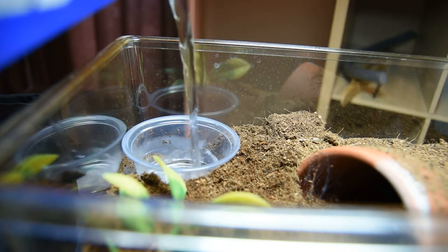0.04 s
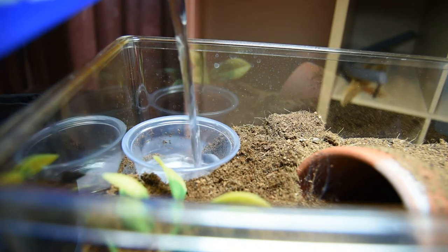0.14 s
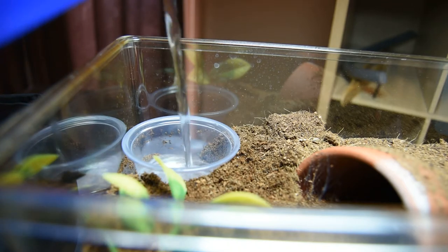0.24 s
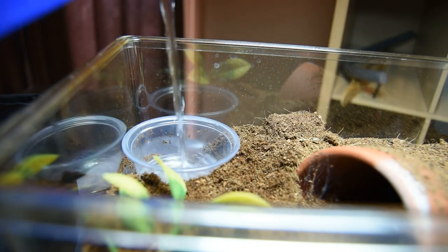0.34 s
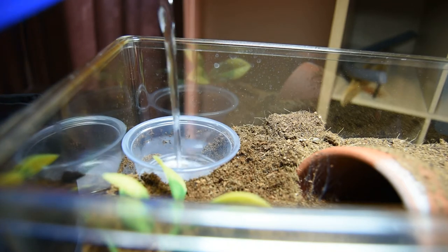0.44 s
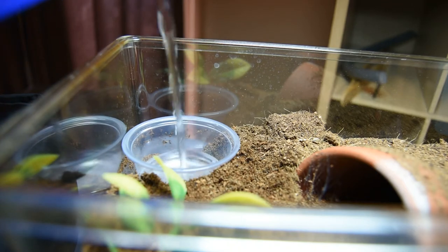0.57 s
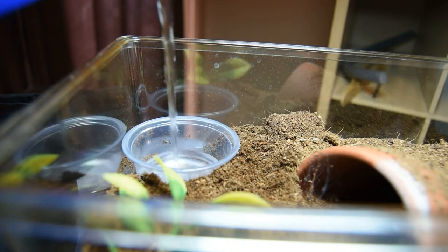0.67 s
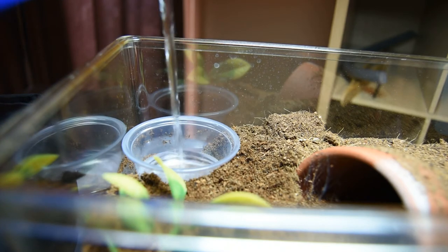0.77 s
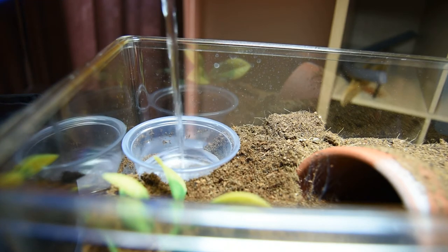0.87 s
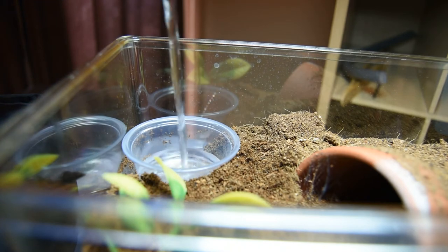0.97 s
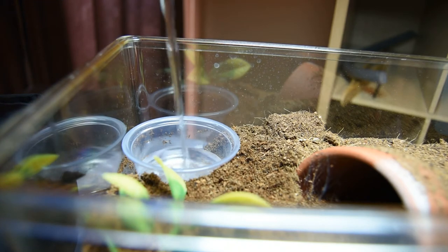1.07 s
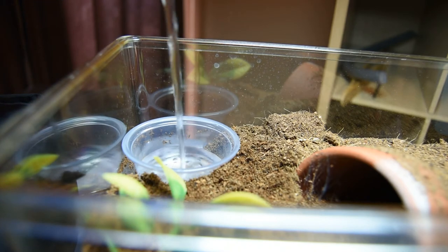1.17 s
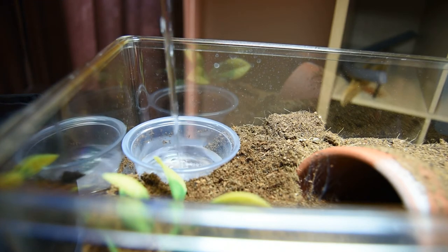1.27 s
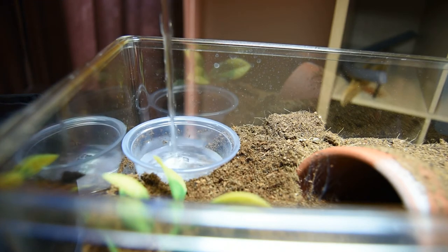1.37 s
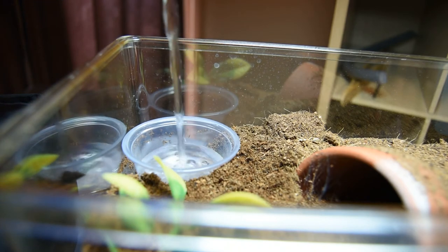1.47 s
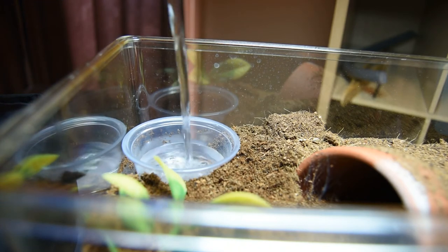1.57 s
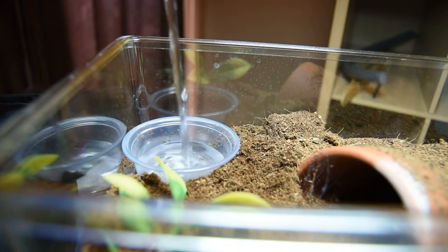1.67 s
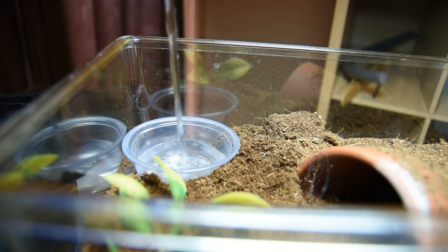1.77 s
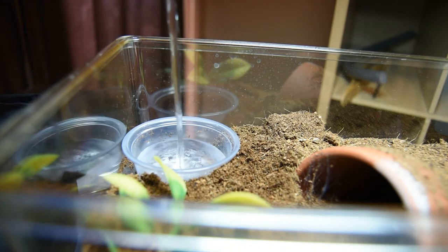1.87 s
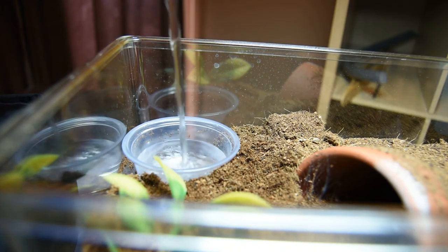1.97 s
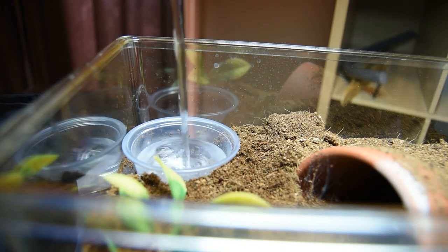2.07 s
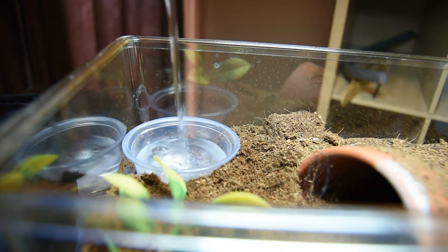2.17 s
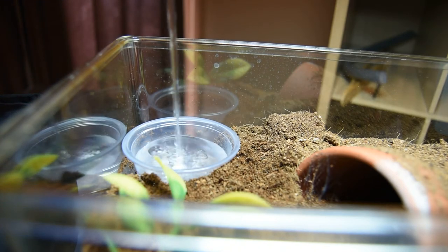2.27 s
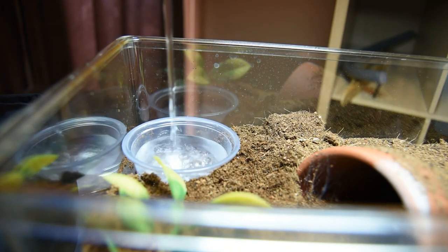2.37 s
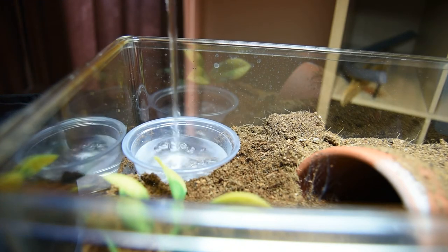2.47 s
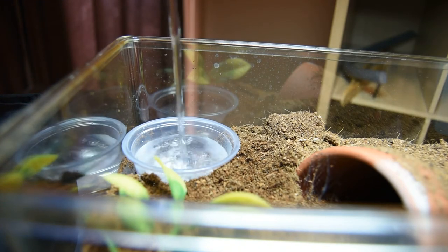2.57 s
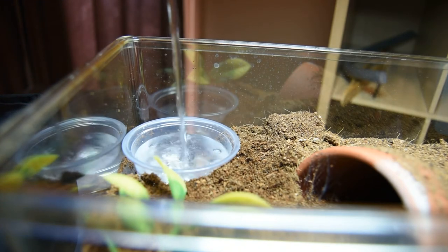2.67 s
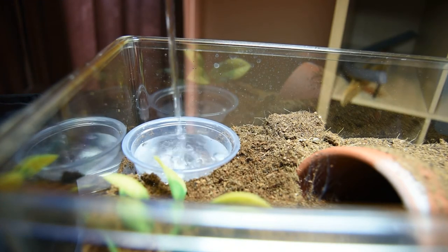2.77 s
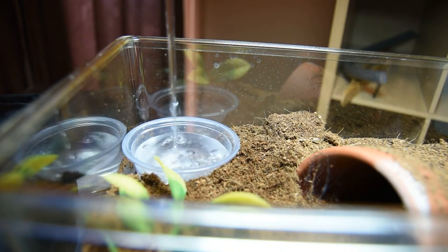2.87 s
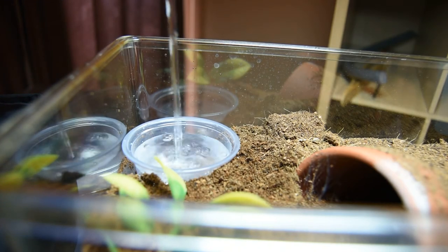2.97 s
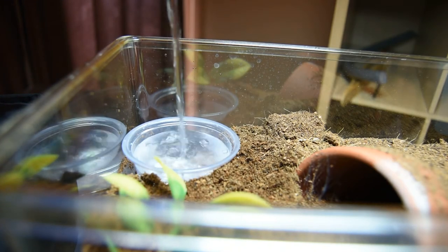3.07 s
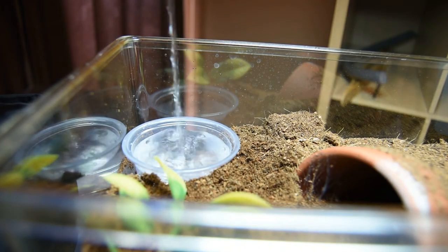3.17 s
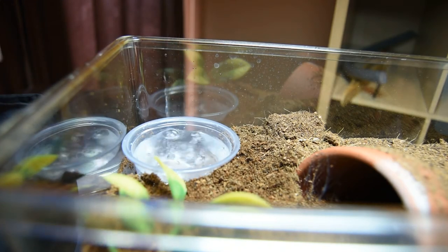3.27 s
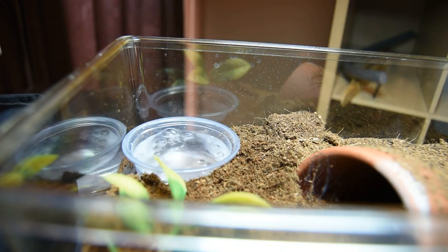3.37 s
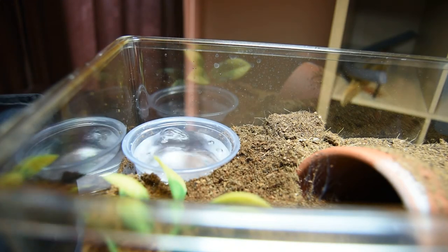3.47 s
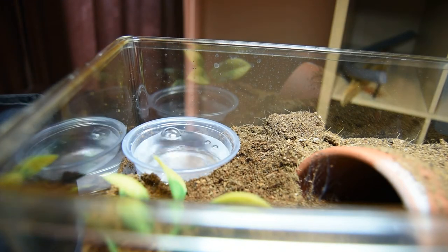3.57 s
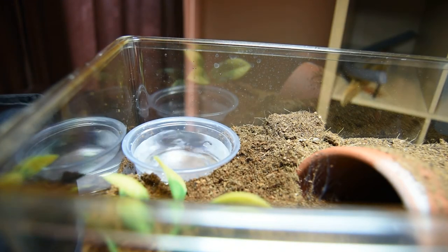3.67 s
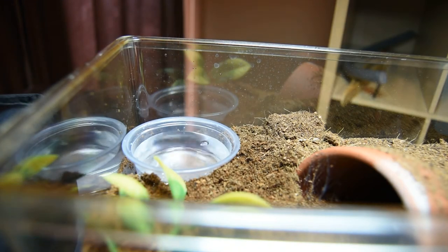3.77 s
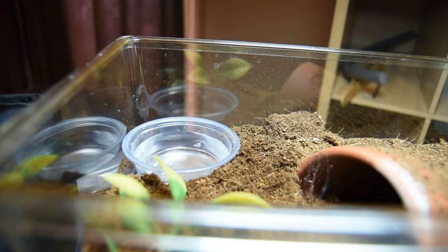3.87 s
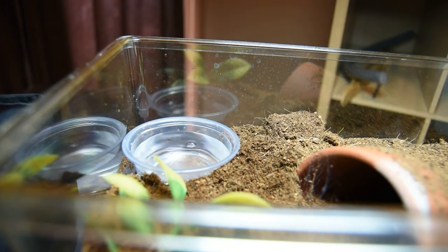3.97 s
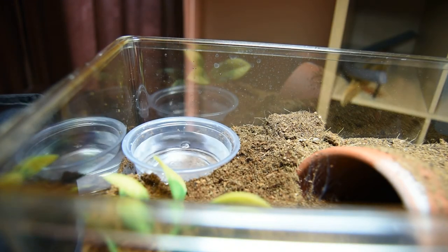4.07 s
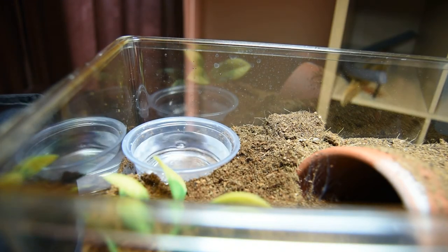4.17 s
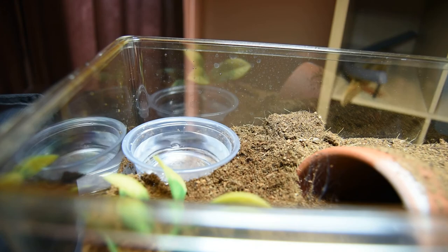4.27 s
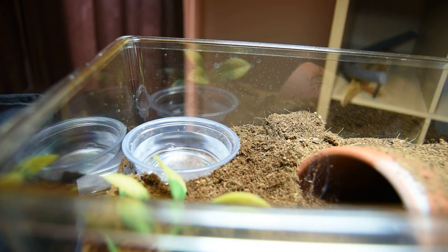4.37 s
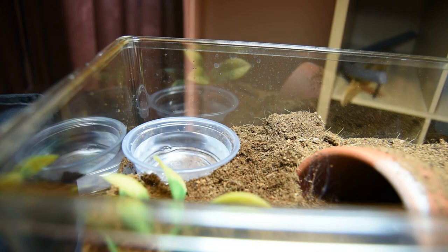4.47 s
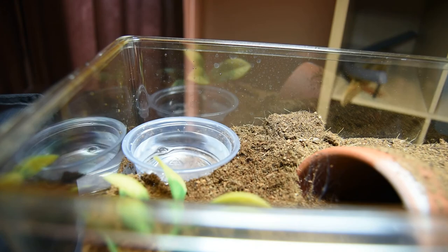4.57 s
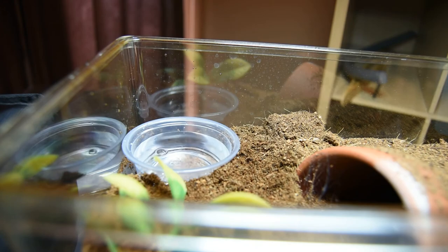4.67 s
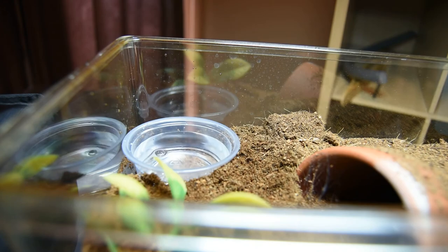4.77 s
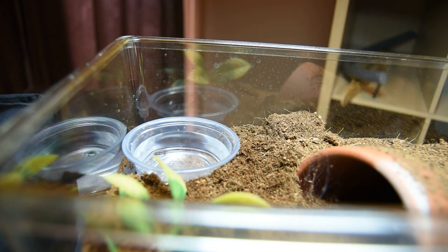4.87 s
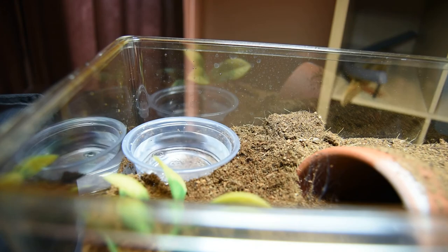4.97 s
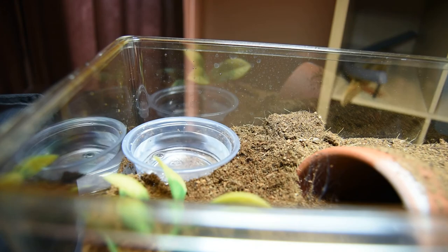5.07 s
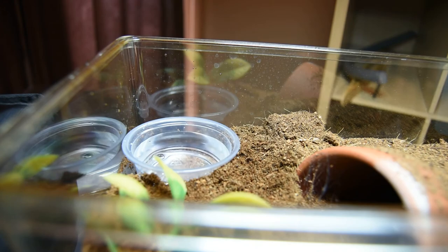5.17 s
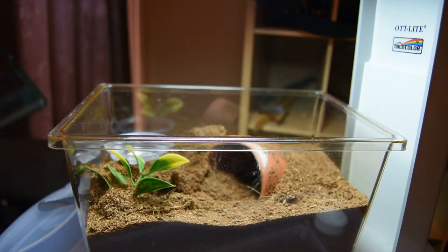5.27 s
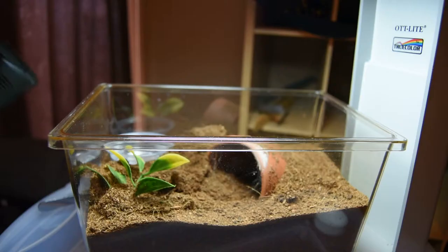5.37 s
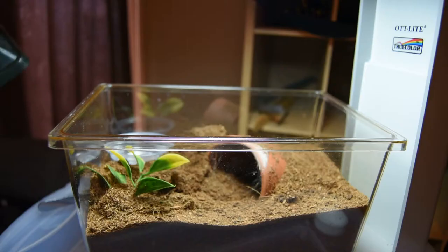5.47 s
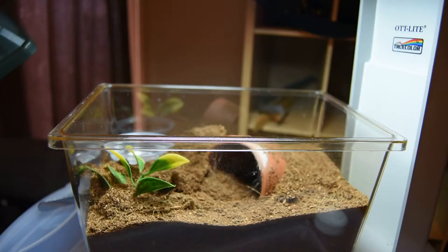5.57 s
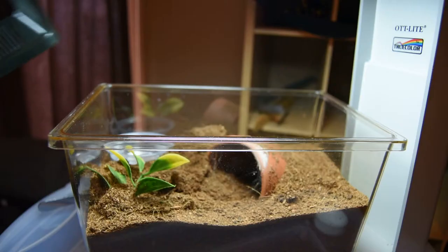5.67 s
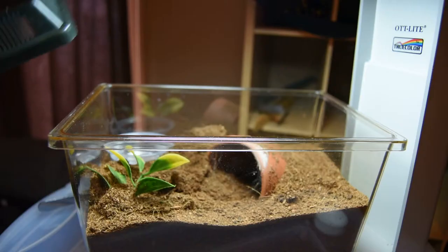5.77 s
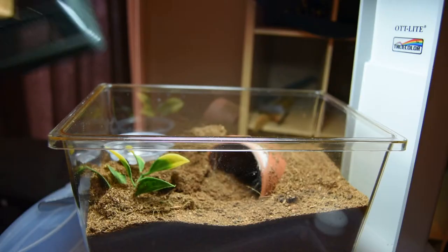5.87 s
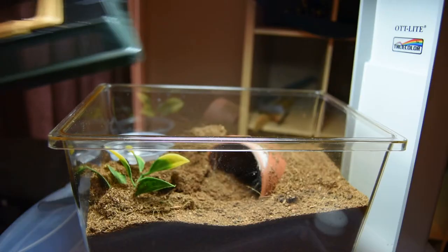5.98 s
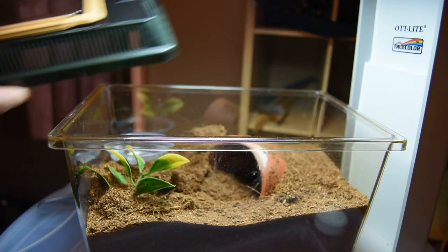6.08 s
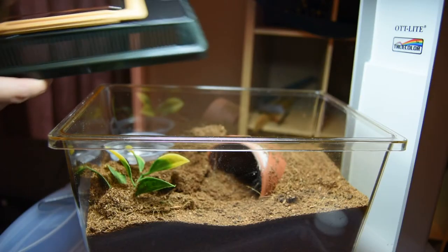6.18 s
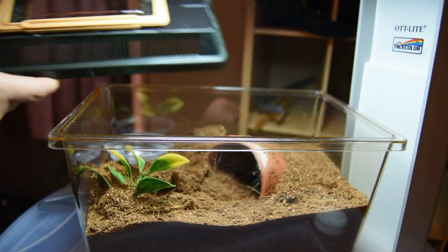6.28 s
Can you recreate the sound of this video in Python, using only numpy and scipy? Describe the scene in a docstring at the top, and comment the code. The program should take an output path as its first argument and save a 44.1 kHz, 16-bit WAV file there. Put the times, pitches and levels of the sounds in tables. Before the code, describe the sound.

Water trickles brightly into a little plastic cup, ends in drips, and a partly filled bottle is set down with rocking clacks.

```python
"""In a small humming room, a thin stream of water is poured into a small plastic cup in a plastic tank.
Drops slap the cup's damped modes, close craters with a spike, tick with spray and ring rising bubbles.
Chirping and bursting bubbles join the stream's swarms, fizz and patter; it ends in a gurgle and drips.
A bottle is set down and rocks, its two low modes bent by sloshing water; plastic in the hand taps,
clinks and slides as contacts and tiny slips ring its resonances."""
import sys
import numpy as np
from scipy import signal
from scipy.fft import rfft, irfft
from scipy.io import wavfile
from scipy.ndimage import uniform_filter1d

SR = 44100
rng = np.random.default_rng(int(sys.argv[2]) if len(sys.argv) > 2 else 0)


def to_wav(s):
    """Save 16-bit WAV."""
    ch = np.atleast_2d(s).T  # columns
    pcm = np.round(np.clip(ch, -1, 1) * 32767)  # PCM
    wavfile.write(sys.argv[1], SR, pcm.astype(np.int16))


N = 279594

# All levels in the tables are relative.
# Distinct drops and bubbles in the cup, loud and faint. Each row: start in seconds, slap in dB,
# spray tick in dB, bubble pitch in Hz, bubble level in dB.
DROP_EVENTS = [(0.1123, -5, -18.5, 950, -17.5), (0.1422, -7, -25.5, 1270, -23),
               (0.1557, -10, -22, 2053, -23), (0.286, -12.5, -20, 873, -37.5),
               (0.307, -21, -25, 1980, -38.5), (0.4679, -12.5, -15, 4770, -29),
               (0.5085, -12, -16, 1700, -31.5), (0.593, -4.5, -19, 910, -23), (0.6187, 5.5, -5, 1620, -14),
               (0.6202, -8, -23.5, 910, -21), (0.7108, -7.5, -16, 1700, -29),
               (0.737, -12.5, -15, 4430, -23), (0.7697, -9.5, -16, 650, -35.5),
               (0.852, -7, -8, 8400, -18.5), (0.895, -6, -13, 1470, -30.5), (0.953, -5.5, -6, 3145, -18.5),
               (1.0041, -6, -15, 1720, -25), (1.0269, -4.5, -5.5, 8800, -16),
               (1.033, -13.5, -24, 4690, -18), (1.14, 2.5, 3.5, 12700, -13), (1.156, -2.5, -20, 1700, -53),
               (1.248, -8, -14.5, 1880, -25), (1.269, -10, -16.5, 1570, -47),
               (1.3165, 4.5, -2.5, 3404, -14), (1.335, 2, 1.5, 3523, -17.5), (1.388, -8, -29, 1540, -39),
               (1.4658, -4, -23, 1660, -53), (1.4941, -9.5, -3.5, 6500, -15.5),
               (1.5045, -6, -16, 2245, -27), (1.625, 7, -7, 1490, -15.5), (1.6578, -2, -20, 1035, -21.5),
               (1.8065, -17, -17, 3300, -26.5), (1.8968, -4.5, -22.5, 1870, -25),
               (1.925, -3, -16, 1490, -39), (1.9472, -13, -12, 1456, -36), (1.9747, -2.5, -2.5, 1782, -25),
               (2.022, -4, -14, 1600, -26), (2.0457, -12, -14, 1566, -28), (2.0762, -30, -14.5, 13900, -18),
               (2.0855, 0.5, -11, 1608, -24.5), (2.096, 0.5, -11, 1580, -46), (2.139, -6, -15, 3460, -27),
               (2.152, -5.5, -11.5, 6050, -14), (2.1782, 3, -14, 1405, -22.5), (2.23, -9, -15, 2090, -30),
               (2.274, -5.5, -26, 3300, -37), (2.2976, -9, -15.5, 1698, -27.5), (2.363, 3.5, -7, 3067, -24),
               (2.3852, 0.5, -9.5, 1053, -18.5), (2.41, -4.5, -5.5, 1510, -21.5),
               (2.4308, -5.5, -12.5, 1320, -38), (2.478, -2.5, -4.5, 1400, -32),
               (2.5333, -2, -9, 986, -24.5), (2.562, -7, -3, 1060, -51), (2.5965, -1.5, -20, 12600, -19),
               (2.6117, -13, -36.5, 5200, -14.5), (2.6261, -2, -24.5, 1022, -26.5),
               (2.668, -3, -12, 5300, -19), (2.7306, -21.5, 4.5, 5092, -15), (2.755, -2, -7.5, 1500, -25),
               (2.793, -0.5, -14.5, 1003, -26), (2.856, -11, -11.5, 1235, -36),
               (2.9191, -19, -16, 3210, -35), (2.9718, -3, -35, 991, -27), (3.013, 3, -4, 1650, -18),
               (3.0445, -23, -21, 3690, -22.5), (3.0679, -7.5, -6.5, 1315, -22.5),
               (3.1294, -10, -10.5, 1680, -24.5), (3.164, -5.5, -9, 1307, -32), (3.23, -4, -5, 6470, -20),
               (3.2321, -3.5, -3.5, 3660, -25), (3.2707, -13, -4, 1794, -28.5),
               (3.3292, -2, -10.5, 1012, -24), (3.3706, -4, -11.5, 2195, -27.5),
               (3.4311, -16, -16, 1170, -45), (3.451, -18, -14, 3300, -34), (3.4758, -28.5, -25, 1300, -45),
               (3.877, -22, -24, 2670, -40)]
# Strength of the stream. Each row: time in seconds, small bubbles in dB, spray in dB.
STREAM_FLOW = [(0, -38, -30), (.5, -13.5, -6), (1.0, -6, -3), (1.45, -11.5, -7.5), (1.65, -5, 0.5),
               (2.15, -4.5, -11), (2.7, -5, 6), (3.12, 3.5, 1), (3.23, -8.5, -8), (3.46, -0.5, 5),
               (3.57, -32, -1.5), (4.1, -55, -35)]
# Colour of the spray. Each row: frequency in Hz, level in dB.
SPRAY_COLOUR = [(100, -41), (1500, -25), (3500, -6.5), (5000, -0.5), (6400, -6.5), (7400, -9), (8600, -5.5),
                (10500, -12.5), (12500, -7.5), (15000, -15.5), (17000, -11.5)]
# Bottle rocking on the table. Each row: start in seconds, lower mode in dB, upper mode in dB, clack in dB.
BOTTLE_KNOCKS = [(4.7397, -24.5, -35, -7), (4.819, -61, -56.5, -5.5), (4.879, -36, -50, -18.5),
                 (4.9056, -24.5, -19.5, -1.5), (4.9483, -28.5, -33.5, -8), (4.9901, -33, -26.5, 8),
                 (5.0968, -34, -39, -2.5), (5.1486, -58.5, -40, -13)]
# Colour of plastic struck or rubbed. Each row: frequency in Hz, level in dB.
PLASTIC_COLOUR = [(100, -41.5), (350, -5), (900, -5), (1500, -4), (2300, -0.5), (2700, -2.5), (3150, -5),
                  (3550, -4.5), (4200, -14), (5300, -12), (8000, -26.5), (16000, -48.5)]


def amp(db):
    """Decibels to gain."""
    return 10 ** (np.asarray(db) / 20)


def evened(x):
    """Scales to an rms of one."""
    return x / np.sqrt(np.mean(x ** 2) + 1e-20)


def decay(t, t60):
    """Exponential decay by 60 dB in t60."""
    return np.exp(-np.log(1000) * t / t60)


def read(points, hz):
    """Interpolates a spectrum table on a log-frequency axis."""
    f, value = np.transpose(points)
    return np.interp(np.log(hz + 1), np.log(f + 1), value)


def curve(rows, column):
    """One column of a time table, at every sample."""
    rows = np.array(rows)
    return np.interp(np.arange(N) / SR, rows[:, 0], rows[:, column])


def add(mix, s, sound):
    """Mixes a sound in at time s."""
    part = mix[max(round(s * SR), 0):][:len(sound)]
    part += sound[:len(part)]


def colour(x, points, tilt_db=0, size=2048):
    """Minimum-phase filter with the given spectrum, tilted about 2 kHz by tilt_db per octave."""
    hz = abs(np.fft.fftfreq(size, 1 / SR))
    octaves = np.log2(np.maximum(hz, 500) / 2000)
    log_gain = np.log(amp(read(points, hz) + tilt_db * octaves))
    taps = np.fft.ifft(np.exp(np.conj(signal.hilbert(log_gain)))).real
    return signal.oaconvolve(x, taps[:size // 2])[:len(x)]


def resonate(x, hz, width_hz):
    """A resonance of gain one that can follow a moving pitch: shift to 0 Hz, smooth, shift back."""
    turn = np.exp(2j * np.pi * np.cumsum(hz * np.ones(len(x))) / SR)
    r = np.exp(-np.pi * width_hz / SR)
    return 2 * (turn * signal.lfilter([1 - r], [1, -r], x / turn + 1e-18)).real


def burst(t60, attack_s, size=3000):
    """A quick spatter of tiny impacts that swells and dies; energy one."""
    t = np.arange(size) / SR
    hit = rng.standard_normal(size) * decay(t, t60) * (1 - np.exp(-t / attack_s))
    return hit / np.linalg.norm(hit)


def background(waver=0.069):
    """Mains hum of appliances, wavering a little, over the still air of the room."""
    # Still air. Each row: frequency in Hz, level in dB per Hz.
    air_colour = [(12, -28.5), (20, 5), (65, -19), (81, -14), (101, 4), (123, -2.5), (146, -10), (177, -12),
                  (228, -20.5), (270, -18), (347, -22), (1440, -29), (3070, -34.5), (3340, -34.5),
                  (16000, -46)]
    # Each row: frequency in Hz, side in dB relative to mid.
    air_width = [(60, -19), (180, -12), (550, -7.5), (1650, -7.5), (4970, 0.5), (15000, -1)]
    # Hum lines. Each row: frequency in Hz, level in dB before the hum's fade.
    hum_lines = [(59, -58), (100.5, -66.5), (120, -50.5), (178.5, -67.5), (275, -69.5)]
    # Each row: time in seconds, gain of the hum in dB.
    hum_fade = [(0, 0.5), (5.15, -1), (5.4, -3.5), (6.34, -5)]
    hz, t = np.fft.rfftfreq(N, 1 / SR), np.arange(N) / SR
    # the room air's bass rumble: Hz, dB
    low_air_colour = [(45, 0.5), (60, -22), (80, 4.0), (120, -9.5), (160, -0.5), (220, 6.5)]
    air = rfft(rng.standard_normal((2, N))) * amp(read(air_colour, hz) + read(low_air_colour, hz))
    air *= amp(-58.5) / irfft(air[0] * (hz > 300), N).std()  # sets mid rms above 300 Hz
    air[1] *= amp(read(air_width, hz))
    out = irfft(air, N)
    for line_hz, db in hum_lines:
        knots = rng.standard_normal(50) + 1j * rng.standard_normal(50)
        drift = np.interp(t, np.linspace(0, t[-1], 50), knots)
        tone = (1 + waver * drift) * np.exp(2j * np.pi * (line_hz * t + rng.random()))
        out[0] += np.sqrt(2) * amp(db + curve(hum_fade, 1)) * tone.real
    return out


def diffuse():
    """Sparse echoes of random sign, each band dying at its own speed; energy one."""
    # Each row: frequency in Hz, t60 in seconds.
    room_t60 = [(100, 0.65), (500, 0.318), (2000, 0.21), (6000, 0.28), (16000, 0.13)]
    taps = (rng.random(SR // 2) < .08) * rng.choice([-1., 1.], SR // 2)
    taps[:int(.006 * SR)] = 0
    hz, t, z = signal.stft(taps, SR, nperseg=256)
    tail = signal.istft(z * decay(t, read(room_t60, hz)[:, None]), SR, nperseg=256)[1]
    return tail / np.linalg.norm(tail)


def space(x, walls_db, room_db, dull_db, off_axis=0.107):
    """Quick echoes off nearby walls, then the room; returns mid and side."""
    # Tank's far wall and the room's nearest. Each row: delay in seconds, level in dB.
    wall_echoes = [(.0074, -20.5), (0.027, -38)]
    # Diffuse sound. Each row: frequency in Hz, side gain in dB.
    room_width = [(100, -9), (1000, -58), (2200, -15.5), (5000, -12.5), (9000, -4), (16000, 0.5)]
    out, t = [], np.arange(SR // 20) / SR
    for _ in range(2):
        walls = (rng.random(len(t)) < .05) * rng.standard_normal(len(t))
        walls = walls * np.exp(-t / 0.0081) * (t > .0008)
        echo = amp(room_db) * diffuse()
        add(echo, 0, amp(walls_db) * walls / np.linalg.norm(walls))
        for delay_s, db in wall_echoes:
            add(echo, delay_s, amp(db) * burst(t60=.004, attack_s=.0005))
        reflected = signal.oaconvolve(x, echo)[:N]
        out.append(colour(reflected, [(100, 0.0059), (2500, 0.006), (12000, dull_db)]))
    # direct sound reaches one of two close ports a moment earlier
    side = colour(out[1], room_width) + off_axis * np.gradient(x)
    return np.array([x + out[0], side])


def thin_plastic(x):
    """Rings the resonances of thin plastic; neighbouring ones swing opposite ways."""
    # Each row: frequency in Hz, width in Hz, level in dB.
    plastic_modes = [(1166, 114, 13), (1350, 130, 11.5), (1530, 120, 11), (1750, 130, 9), (2110, 160, 2),
                     (3300, 70, 5), (4540, 365, -2)]
    return sum((-1) ** k * amp(db) * resonate(x, hz, width_hz)
               for k, (hz, width_hz, db) in enumerate(plastic_modes))


def rubs(grain_db=1.5, slips_per_s=1100, ring_db=-9):
    """Plastic sliding in the hand: a fading run of separate tiny slips that ring its resonances."""
    # Each row: start in seconds, length in seconds, level in dB.
    slides = [(4.342, 0.045, -41.5), (4.431, 0.33, -59), (5.336, 0.089, -59), (5.621, 0.9, -66.5),
              (6.086, 0.15, -57.5), (6.154, 0.31, -59)]
    out = np.zeros(N)
    for s, length_s, db in slides:
        age = np.linspace(0, 1, int(length_s * SR))
        grain = amp(grain_db * np.minimum(rng.exponential(1, len(age)), 2))
        sizes = rng.standard_normal(len(age)) * grain
        slips = colour(sizes * (rng.random(len(age)) < slips_per_s / SR), PLASTIC_COLOUR)
        rubbed = evened(slips + amp(ring_db) * thin_plastic(slips))
        add(out, s, amp(db) * rubbed * np.minimum(age * 10, 1) * (1 - age))
    return out


def clinks():
    """Thin plastic clinks and bounces as the bottle is lowered: quick contacts set it ringing."""
    # Each row: start in seconds, level in dB.
    contacts = [(4.3461, -10), (4.357, -12), (4.377, -18)]
    hits = np.zeros(N)
    for s, db in contacts:
        add(hits, s, amp([db]))
    return thin_plastic(hits)


def clacks(shell_db=-45, contact_db=-3.0):
    """Hard plastic chatters in sharp, slightly gritty contacts and its shell rings."""
    # Light taps in the hand. Each row: start in seconds, level in dB, brightness in dB per octave.
    hand_taps = [(4.3303, -12, 3.5), (4.4314, -12, 3.5), (4.553, -20.5, 7), (4.583, -14.5, -2),
                 (4.696, -6.5, -1.5), (4.8645, -14, 2.5), (4.9863, -8, 4), (5.007, -5, 2),
                 (5.349, -19.5, -7), (5.623, -8.5, -2), (5.644, -13.5, -5)]
    # Plastic shell. Each row: frequency in Hz, level in dB, t60 in seconds.
    shell_modes = [(517, -20, 0.025), (1400, 1, .08), (1850, -26.5, .12), (2200, -15, 0.1),
                   (2301, -10.5, 0.14), (2450, -14, 0.16), (2624, -16, 0.15), (2780, -14.5, 0.18),
                   (3300, -18, 0.2), (3550, -14.5, 0.2), (4604, -5.5, .13), (5267, -2, 0.074),
                   (5460, -14, 0.12)]
    # Chatter after each contact. Each row: delay in seconds before a random stretch, level in dB.
    chatter = [(0, -0.5), (.0066, -13), (0.017, -19)]
    tilt_db, harder_tilt_db = -0.5, 0.2971  # dB per octave; more per dB of force: harder is brighter
    spot_db = 2
    out, t = np.zeros(N), np.arange(SR // 4) / SR
    knocks = [(s, db, tilt_db + harder_tilt_db * db) for s, _, _, db in BOTTLE_KNOCKS]
    for s, db, tilt in knocks + hand_taps:
        # each blow lands on a different spot and favours different modes
        shell = sum(amp(mode_db + spot_db * rng.standard_normal()) * decay(t, t60)
                    * np.sin(2 * np.pi * hz * t) for hz, mode_db, t60 in shell_modes)
        for delay_s, rebound_db in chatter:
            contact = .7 * burst(t60=.006, attack_s=.0002)
            contact[0] += 1
            at_s = s + delay_s * rng.uniform(.85, 1.15)
            hit = amp(db + rebound_db) * colour(contact, PLASTIC_COLOUR, tilt)
            add(out, at_s, amp(contact_db) * hit)
            add(out, at_s, amp(shell_db) * signal.fftconvolve(hit, shell))
    return out


def bottle(ring_db=1.0, lower_width_hz=10, upper_width_hz=17, choke_t60_s=0.055,
           thump_db=5, thump_hz=500, thump_width_hz=130, rap_hz=720, rap_width_hz=260):
    """Knocks thump the table and ring two water-laden bottle modes until the next contact chokes them."""
    # Sloshing water bends the modes. Each row: time in seconds, lower mode in Hz, upper mode in Hz.
    slosh_pitch = [(4.746, 416, 801.6), (4.85, 418, 790), (4.908, 339, 806.3), (4.931, 384, 883),
                   (4.955, 398.3, 770.4), (4.99, 327.4, 772.6), (5.059, 312, 827), (5.099, 280, 766),
                   (5.14, 346.5, 722)]
    out, t = np.zeros(N), np.arange(SR // 3) / SR
    blow = 1. * (t == 0)
    times, lower_hz, upper_hz = np.transpose(slosh_pitch)
    next_contacts = [row[0] for row in BOTTLE_KNOCKS[1:] + BOTTLE_KNOCKS[-1:]]
    for (s, lower_db, upper_db, _), until in zip(BOTTLE_KNOCKS, next_contacts):
        modes = [(amp(lower_db + ring_db), np.interp(s + t, times, lower_hz), lower_width_hz),
                 (amp(upper_db + ring_db), np.interp(s + t, times, upper_hz), upper_width_hz),
                 # broad thump and rap of the table, opposite in sign to the bottle's ring
                 (-amp(lower_db + thump_db), thump_hz, thump_width_hz),
                 (-amp(upper_db + thump_db), rap_hz, rap_width_hz)]
        # scaled so that a mode starts near its gain whatever its width
        ring = sum(gain * resonate(blow, hz, width_hz) * SR / (2 * np.pi * width_hz)
                   for gain, hz, width_hz in modes)
        add(out, s, ring * decay(np.maximum(s + t - until, 0), choke_t60_s))
    # a soft contact holds no treble
    return colour(out, [(100, 8.0), (300, -3.5), (950, -4.0), (1800, -3), (6000, -27)])


def bubble(hz, t60, rise):
    """A trapped bubble swells over a cycle or two and rings, going up in pitch as it nears the surface."""
    age = np.arange(int(t60 * SR) + 2) / SR / t60
    rise = rise / (1 + (hz / 6000) ** 2)  # the tiniest die before they get far
    turns = np.cumsum(hz * (1 + rise * (age - .1))) / SR
    return np.sin(2 * np.pi * turns) * decay(age, 1) * (1 - np.exp(-turns ** 2))


def pops(ping_db=1, ping_t60_s=0.0015, film_db=3, film_t60_s=0.00246):
    """Tiny bubbles burst: the film tears with a tick and the hollow pings for a few cycles."""
    # Each row: start in seconds, pitch in Hz, level in dB.
    film_bursts = [(0.2967, 10000, -31), (0.48, 11130, -26.5), (0.6195, 9000, -13.5), (0.6448, 7120, -18.5),
                   (0.7687, 8400, -22.5), (0.8465, 7800, -21), (0.9957, 7300, -21), (1.1012, 11550, -23.5),
                   (1.5524, 10640, -30.5), (1.5846, 8600, -20.5), (1.647, 7040, -18.5),
                   (1.7823, 12000, -26), (2.1878, 11500, -26), (2.2041, 12100, -22), (2.8497, 8700, -21.5),
                   (3.091, 12370, -23.5), (3.308, 5600, -18), (3.413, 11600, -27.5), (3.4415, 10400, -25),
                   (3.5265, 12070, -30.5), (3.604, 8580, -28.5), (3.655, 9800, -30.5), (3.751, 5260, -26.5)]
    out = np.zeros(N)
    for s, hz, db in film_bursts:
        add(out, s, amp(db + ping_db) * bubble(hz, ping_t60_s, 0.43))
        tear = colour(burst(t60=film_t60_s, attack_s=0.00018), SPRAY_COLOUR)
        add(out, s, amp(db + film_db) * tear)
    return out


def chirps(chirp_db=1.0, shed_db=-10.5, peak_age=0.2, bend=1.41, waver_octaves=.055, flutter_share=.38):
    """Air pinched off under the surface swells, climbs ever faster, shakes and sheds smaller bubbles."""
    # Each row: start in seconds, length in seconds, first pitch in Hz, climb in octaves, level in dB.
    pinched_air = [(1.225, 0.00695, 2820, 0.19, -36.5), (1.605, 0.02, 2880, 0.36, -36.5),
                   (1.756, 0.014, 1540, 0.59, -35), (2.065, 0.0122, 3300, 0.3, -42),
                   (2.14, 0.00763, 3210, 0.48, -38.5), (2.229, 0.014, 2060, 0.24, -32),
                   (2.2724, 0.02026, 3078, 0.405, -33), (2.362, 0.017, 2857, 0.46, -37),
                   (2.572, 0.00897, 1060, 0.34, -30.5), (2.613, 0.0078, 2660, 0.22, -31.5),
                   (2.714, 0.00228, 5300, 0.24, -30), (2.8, 0.016, 1596, 1.44, -34.5),
                   (2.834, 0.0057, 4270, 0.34, -37), (2.858, 0.00723, 1850, 0.34, -35),
                   (2.915, 0.0188, 1530, 0.15, -35), (2.988, 0.0049, 4480, 0.45, -33.5),
                   (3.013, 0.012, 1530, 0.69, -21.5), (3.045, 0.0081, 2670, 0.89, -32.5),
                   (3.103, 0.0062, 2800, 0.73, -36), (3.356, 0.0064, 4540, 0.49, -38.5),
                   (3.3724, 0.0044, 2087, 0.356, -27), (3.3731, 0.003, 3820, 0.68, -26),
                   (3.404, 0.0082, 1560, .2, -43), (3.432, 0.01, 1850, 0.115, -39.5),
                   (3.494, 0.0091, 1720, 0.11, -45), (3.522, 0.0046, 3200, 0.36, -40.5),
                   (3.645, 0.0044, 4700, 0.18, -48.5)]
    out = np.zeros(N)
    for s, length_s, hz, octaves, db in pinched_air:
        age = np.linspace(0, 1, int(length_s * SR))
        # the churning water shakes pitch and strength
        waver, flutter = (evened(uniform_filter1d(z - z.mean(), size=40))
                          for z in rng.standard_normal((2, len(age))))
        turns = np.cumsum(hz * 2 ** (octaves * age ** bend + waver_octaves * waver)) / SR
        swell = age / peak_age * np.exp(1 - age / peak_age) * np.minimum(10 * (1 - age), 1)
        strength = amp(db + chirp_db) * swell * (1 + flutter_share * flutter)
        add(out, s, strength * np.sin(2 * np.pi * turns))
        for delay_s, shift in rng.uniform((0, -.6), (.022, .6), (5, 2)):
            add(out, s + delay_s, amp(db + shed_db) * bubble(hz * 2 ** shift, length_s, 1 / 2))
    return out


def gurgle(fade_db=-11.5, rise=0.0638):
    """As the stream breaks up, one large bubble bloops repeatedly: it swells, rises and stops short."""
    # Each row: start in seconds, length in seconds, pitch in Hz, level in dB.
    bloops = [(3.305, 0.024, 873, -36), (3.332, 0.0084, 950, -40), (3.359, .022, 847, -36),
              (3.4007, 0.017, 884.5, -34.5), (3.433, .016, 870, -39), (3.45, 0.0218, 892.4, -30.5)]
    out = np.zeros(N)
    for s, length_s, hz, db in bloops:
        age = np.linspace(0, 1, int(length_s * SR))
        turns = np.cumsum(hz * (1 + rise * age)) / SR
        edges = np.minimum(10 * np.minimum(age, 1 - age), 1)
        add(out, s, amp(db + fade_db * age) * edges * np.sin(2 * np.pi * turns))
    return out


def cup(x, top_hz=4500, wander_octaves=.13):
    """Water and thin cup walls answer a slap; pitches wander as drops land in different spots."""
    # Each row: centre frequency in Hz, width in Hz, level in dB.
    cup_modes = [(319, 361, -1.5), (595, 334, -2.5), (944, 146, 4.5), (1650, 340, 2.5), (2304, 271, -4.5),
                 (2820, 237, -3), (3480, 86, -5), (5300, 330, -13.5)]
    knots = rng.uniform(-wander_octaves, wander_octaves, 150)
    wander = 2 ** np.interp(np.arange(N), np.linspace(0, N, 150), knots)
    # neighbouring modes swing opposite ways
    ring = sum((-1) ** k * amp(db) * resonate(x, hz * wander, width_hz)
               for k, (hz, width_hz, db) in enumerate(cup_modes))
    return signal.sosfilt(signal.butter(4, top_hz, fs=SR, output="sos"), ring)


def swarm(count, level, low_hz, octaves, slope_db, spread_db, cycles, rise):
    """Many small bubbles of random pitch, size and life; most are faint."""
    out = np.zeros(N)
    for when, pitch, size, life in rng.random((count, 4)):
        s = when * STREAM_FLOW[-1][0]
        hz = min(low_hz * 2 ** (octaves * pitch), SR / 2.8)
        db = slope_db * octaves * pitch - spread_db * np.log(size + .05)
        add(out, s, level[int(s * SR)] * amp(db) * bubble(hz, cycles * (.5 + life) / hz, rise))
    return out


def stream(bubble_db=-47, spray_db=-52, wash_db=-52, patter_db=-20, patter_per_s=300,
           mist_db=-59, grain_db=27.0):
    """The stream drags under bubbles and a fainter wash, throws fine spray and patters on the cup."""
    churn, spray = amp(curve(STREAM_FLOW, 1)), amp(curve(STREAM_FLOW, 2))
    small = swarm(count=1600, level=churn, low_hz=1100, octaves=2.2, slope_db=-.5, spread_db=3.5,
                  cycles=34, rise=.6)
    fine = swarm(count=1500, level=spray, low_hz=4500, octaves=1.8, slope_db=0, spread_db=5,
                 cycles=18, rise=.1)
    wash = swarm(count=4500, level=churn, low_hz=1300, octaves=1.8, slope_db=-1, spread_db=1.5,
                 cycles=26, rise=.5)
    patter = (rng.random(N) < patter_per_s / SR) * rng.standard_normal(N)
    # the tiniest droplets merge into a fizz
    grain = amp(grain_db * np.minimum(rng.exponential(1, N), 5))
    mist = evened(rng.standard_normal(N) * grain)
    bubbles = amp(bubble_db) * small + amp(wash_db) * wash + amp(spray_db) * fine
    fizz = amp(mist_db) * colour(mist * spray, SPRAY_COLOUR)
    return bubbles + amp(patter_db) * cup(patter * churn) + fizz


def dribble(count=190, slap_db=-20, tick_db=-23, bubble_db=-36, spread_db=4, low_hz=1300, octaves=2.495):
    """Small drops at loose intervals, following the stream's strength; rows like DROP_EVENTS."""
    from_s, to_s = .45, 3.3
    gather_s = 0.027  # a distinct drop gathers the water ahead of it: small ones this long before are muted
    churn, spray = curve(STREAM_FLOW, 1), curve(STREAM_FLOW, 2)
    rows = []
    for k, (when, pitch, a, b, c) in enumerate(rng.random((count, 5))):
        s = from_s + (to_s - from_s) * (k + when) / count
        at = int(s * SR)
        slap, tick, ring = spread_db * (2 * np.array([a, b, c]) - 1)
        gathered = any(0 < drop[0] - s < gather_s for drop in DROP_EVENTS)
        clear_db = -60 if gathered else 0
        rows.append((s, clear_db + slap_db + churn[at] + slap,
                     clear_db + tick_db + spray[at] / 2 + tick,
                     low_hz * 2 ** (octaves * pitch),
                     clear_db + bubble_db + churn[at] / 2 + ring))
    return rows


def collapse(hz, size=132):
    """The crater under a drop snaps shut: a sharp pressure spike between two dips, strongest near hz."""
    u = np.pi * hz * (np.arange(size) - size / 4) / SR
    return (1 - 3 * u ** 2) / (1 + u ** 2) ** 3


def drops(slap_db=-2.5, crater_db=-18.5, tick_db=-2.5, bubble_db=-3, rise=0.41, splatter=0.73,
          snap=0.37, satellite_db=-9, lead_s=.0001):
    """Each drop: a slap, its crater's collapse, a tick of spray, and a bubble that sheds smaller ones."""
    ring_s = 0.0424  # t60 of a 1 kHz bubble in deep water; inverse to pitch
    shallow_ring, fill_s = 0.513, 2.53  # share of the ring in the empty cup; time to reach all of it
    slaps, craters, ticks, bubbles = np.zeros((4, N))
    for s, slap, tick, hz, db in DROP_EVENTS + dribble():
        depth = min(shallow_ring + (1 - shallow_ring) * s / fill_s, 1)
        t60 = ring_s * depth * 1000 / hz
        add(slaps, s, amp([slap]))
        add(slaps, s, amp(slap) * splatter * burst(t60=0.049, attack_s=0.00093))
        add(craters, s, amp(slap) * collapse(np.clip(hz, 1000, 1800)))
        # every splash breaks up differently, so each has its own humps in the treble
        humps = [(f, 3.5 * rng.standard_normal()) for f in np.linspace(2000, 16000, 12)]
        add(ticks, s - lead_s, amp(tick) * colour(burst(t60=.004, attack_s=.002), humps))
        add(ticks, s + .0007, snap * amp([tick]))
        own_rise = rise * (.5 + rng.random()) * min(hz / 2000, 1)
        add(bubbles, s, amp(db) * bubble(hz, t60, own_rise))
        for delay_s, octaves in rng.uniform((.001, -.5), (.016, .5), (3, 2)):
            satellite = bubble(hz * 2 ** octaves, t60 / 2, rise)
            add(bubbles, s + delay_s, amp(db + satellite_db) * satellite)
    impact = amp(slap_db) * cup(slaps) + amp(crater_db) * craters
    spray = amp(tick_db) * colour(ticks, SPRAY_COLOUR)
    return impact + spray + amp(bubble_db) * bubbles


def scene():
    """The pour in the tank, the handling beside it, and the room."""
    pour = drops() + chirps() + pops() + gurgle() + stream()
    # a small cup radiates little bass
    pour = colour(pour, [(100, -13.5), (170, -6.5), (250, 2.5), (420, -3), (650, -2.5),
                         (1000, -1.0), (16000, 2.0)])
    water = space(pour, walls_db=-9.5, room_db=-11.0, dull_db=-2.0)
    handling = space(clacks() + clinks() + rubs(), walls_db=0.0, room_db=-4.0, dull_db=5.5)
    mid, side = water + handling + background()
    # the bottle's low ring comes straight through the table and barely stirs the room
    low = bottle()
    mid = mid + low + amp(-11.0) * signal.oaconvolve(low, diffuse())[:N]
    return np.array([mid + side, mid - side]) * amp([[.22], [-.22]])  # balance in dB


def record(dry, edge_hz=16100):
    """Linear-phase low-pass that limits the band."""
    taps = signal.firwin(511, edge_hz, window=("kaiser", 9), fs=SR)
    return signal.oaconvolve(dry, taps[None], "same")


dry = scene()
out = record(dry)
to_wav(out)
```